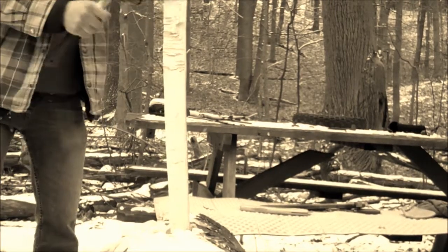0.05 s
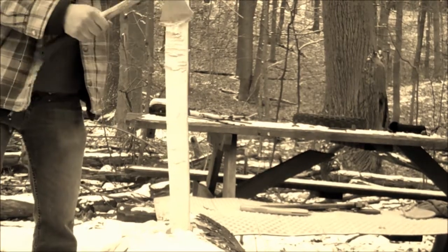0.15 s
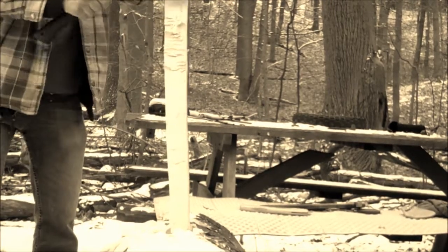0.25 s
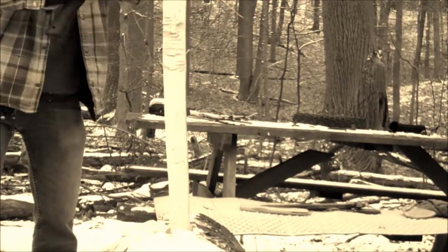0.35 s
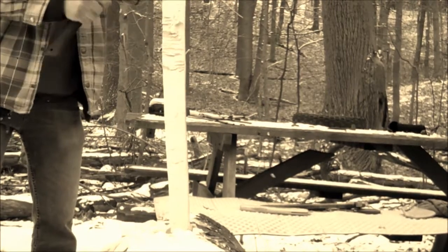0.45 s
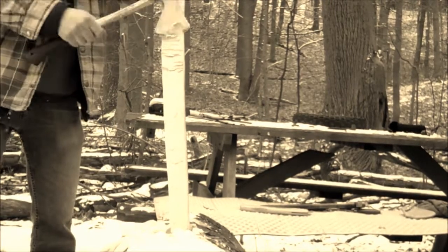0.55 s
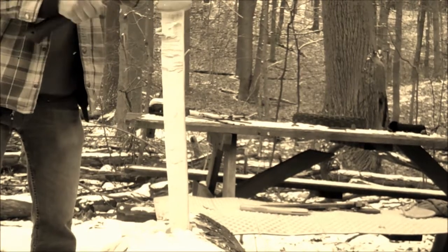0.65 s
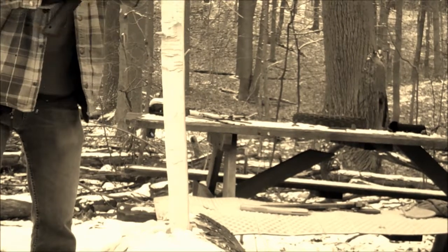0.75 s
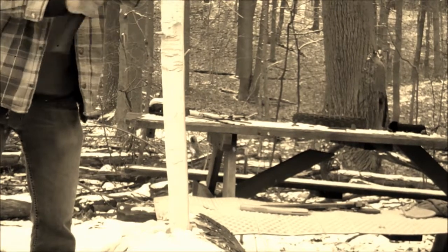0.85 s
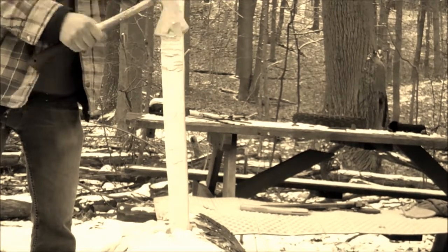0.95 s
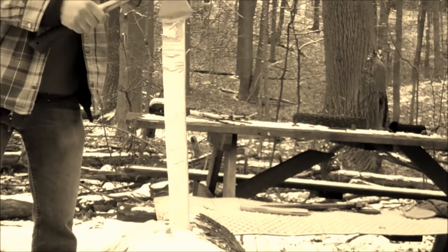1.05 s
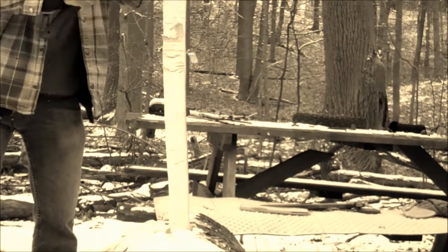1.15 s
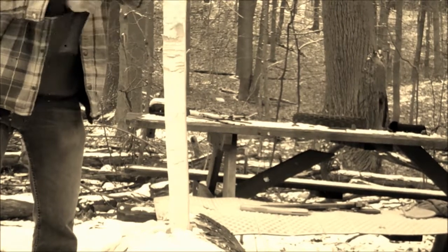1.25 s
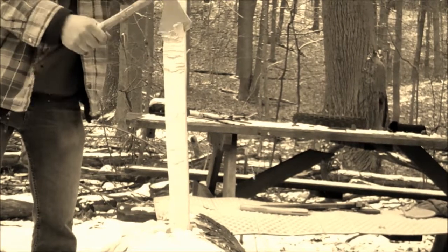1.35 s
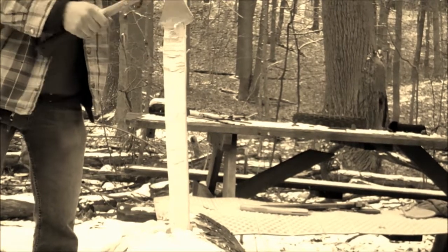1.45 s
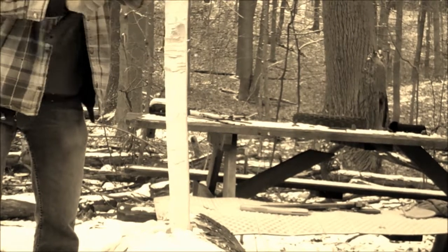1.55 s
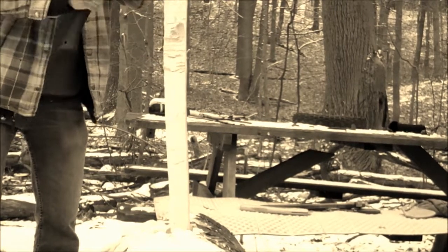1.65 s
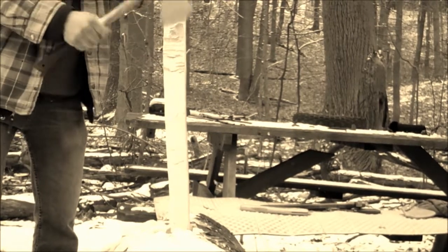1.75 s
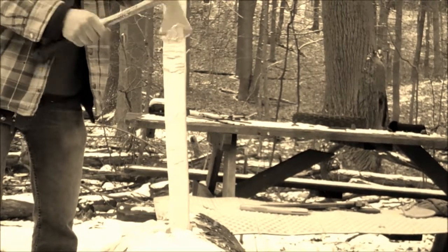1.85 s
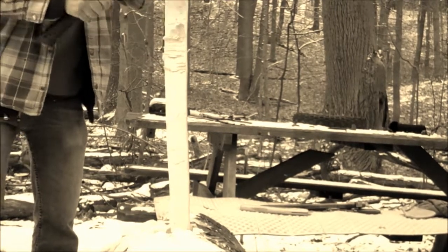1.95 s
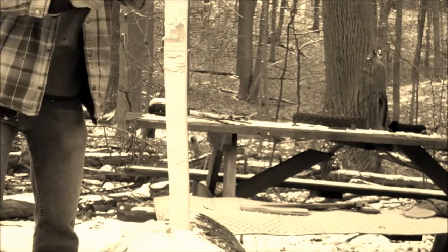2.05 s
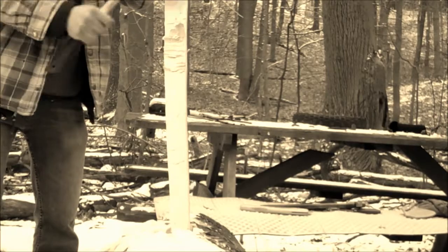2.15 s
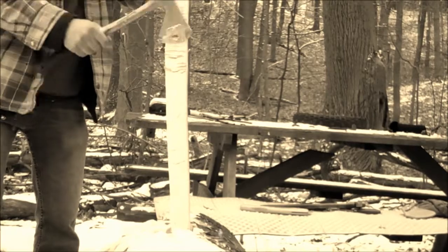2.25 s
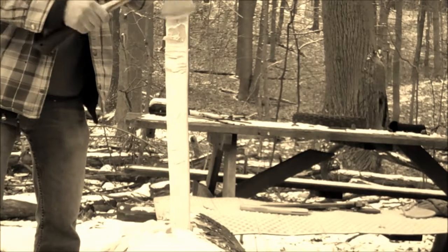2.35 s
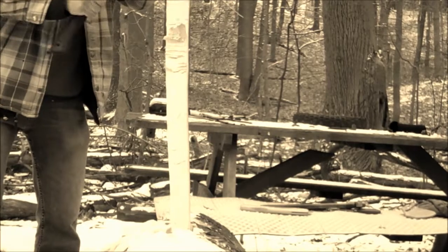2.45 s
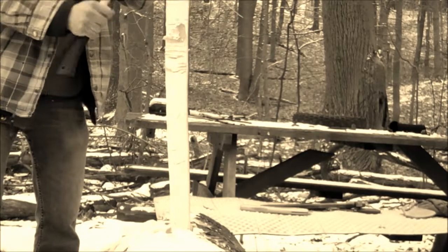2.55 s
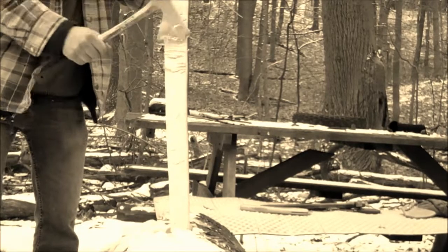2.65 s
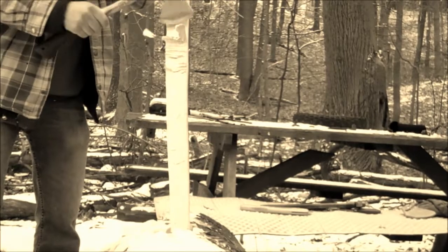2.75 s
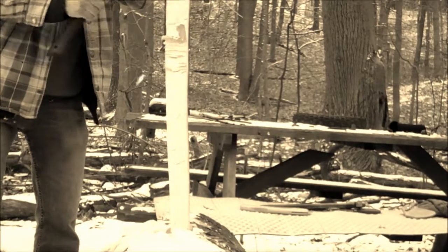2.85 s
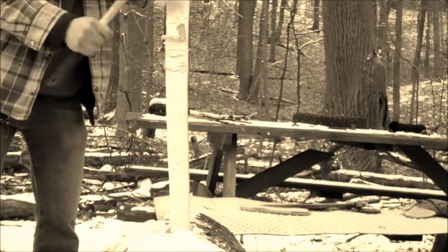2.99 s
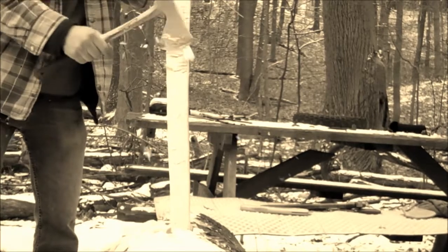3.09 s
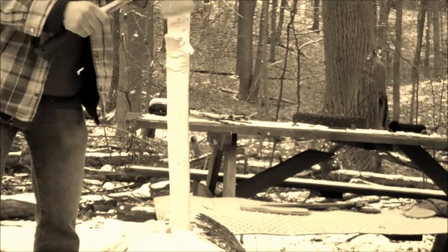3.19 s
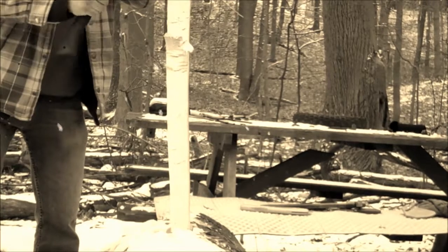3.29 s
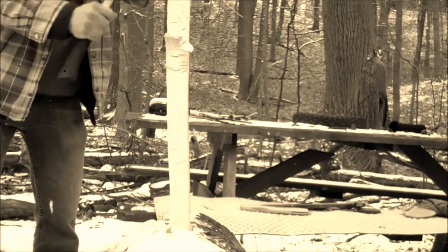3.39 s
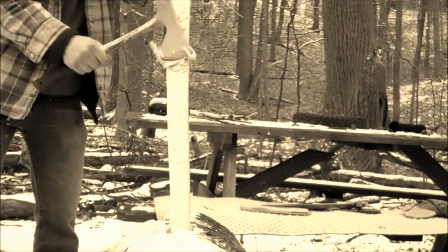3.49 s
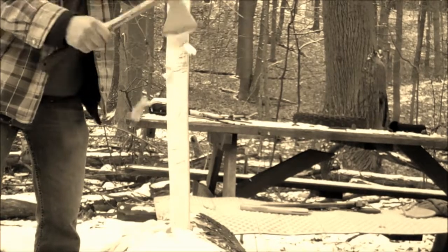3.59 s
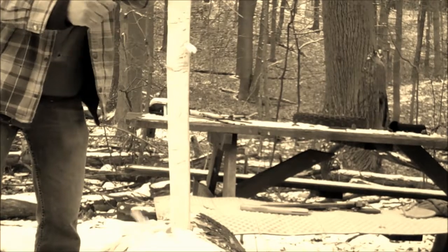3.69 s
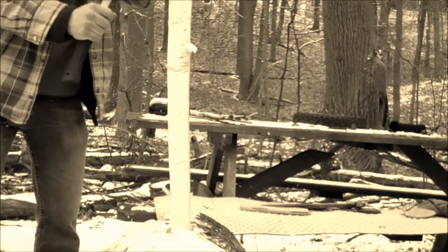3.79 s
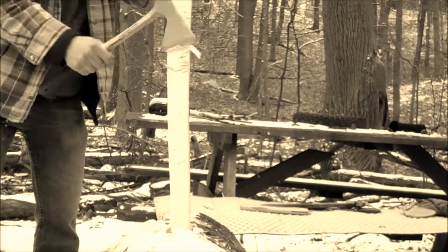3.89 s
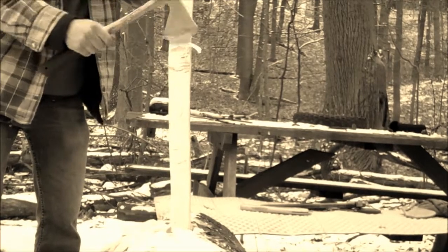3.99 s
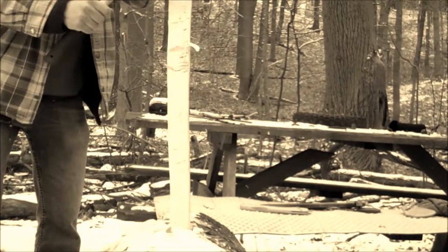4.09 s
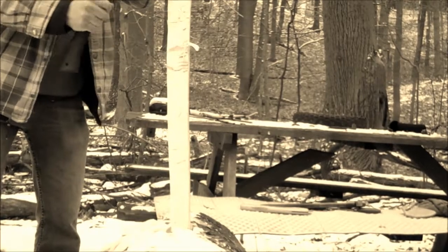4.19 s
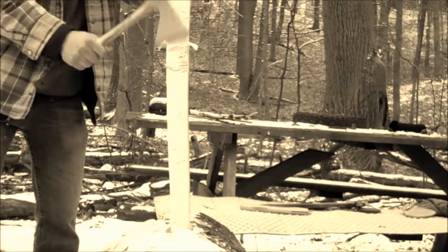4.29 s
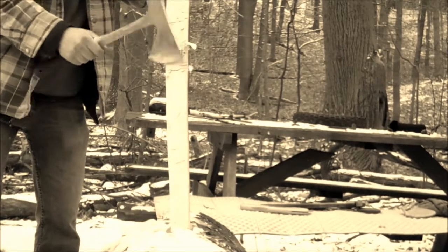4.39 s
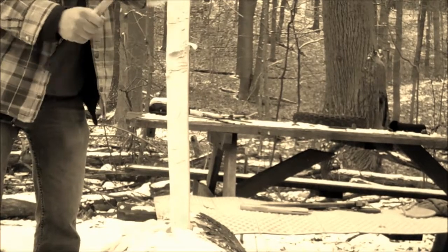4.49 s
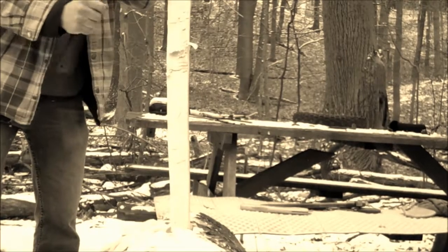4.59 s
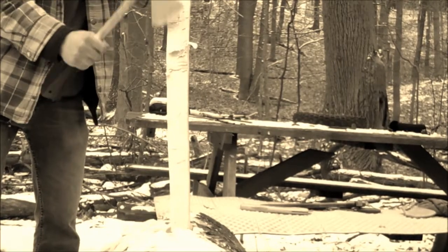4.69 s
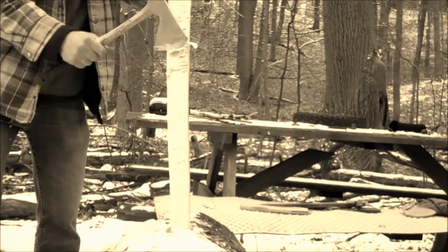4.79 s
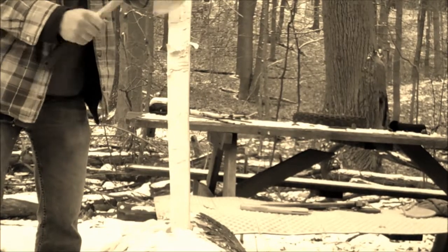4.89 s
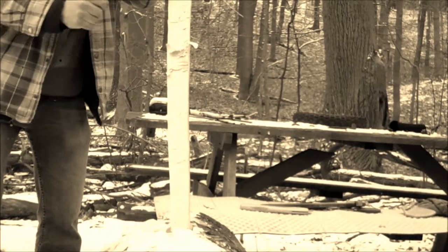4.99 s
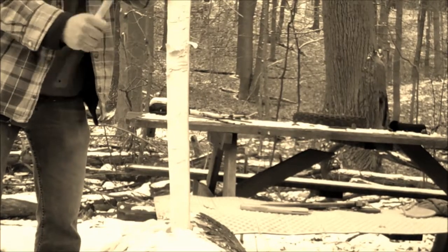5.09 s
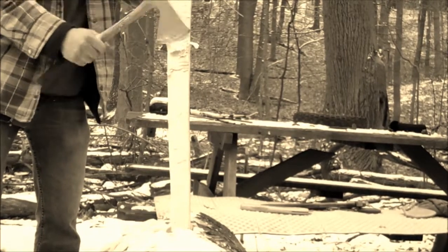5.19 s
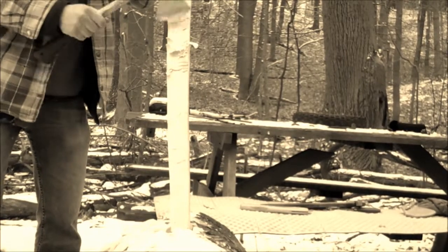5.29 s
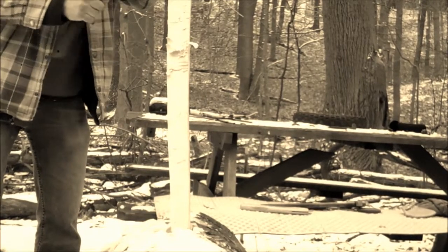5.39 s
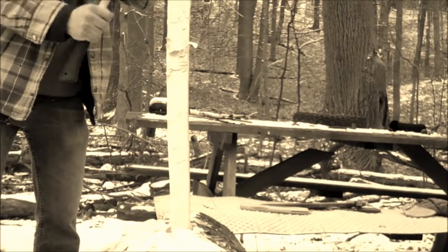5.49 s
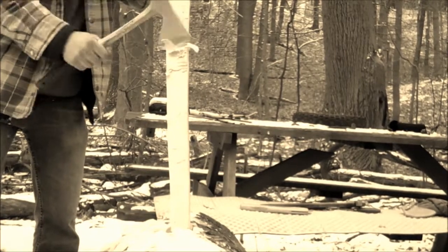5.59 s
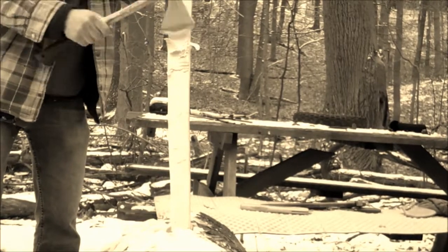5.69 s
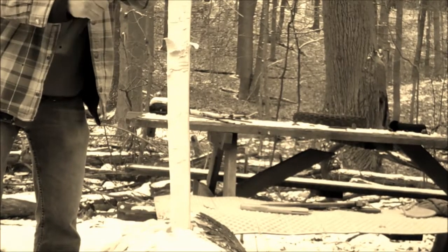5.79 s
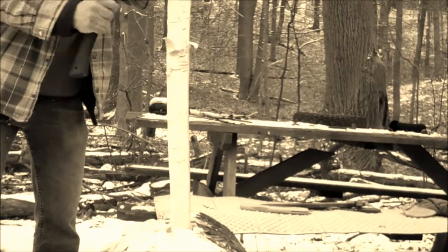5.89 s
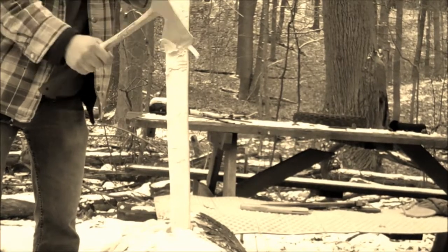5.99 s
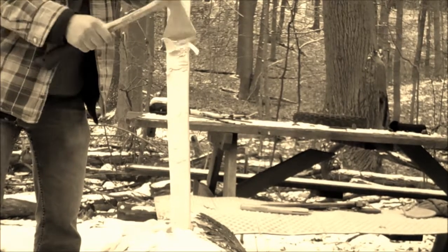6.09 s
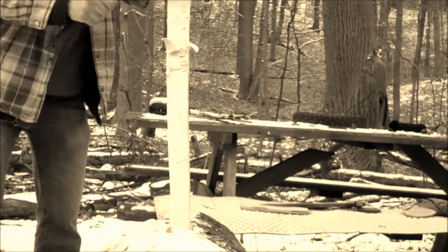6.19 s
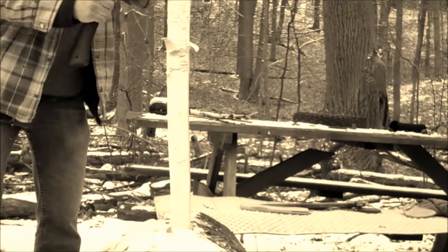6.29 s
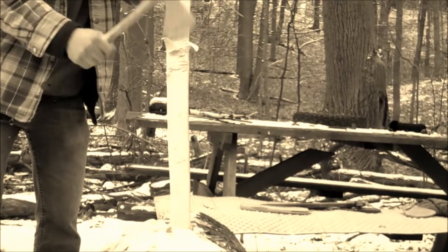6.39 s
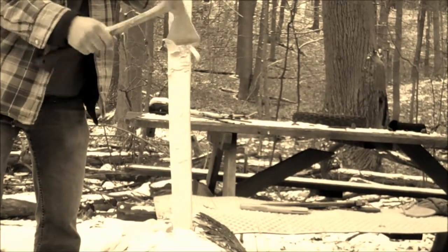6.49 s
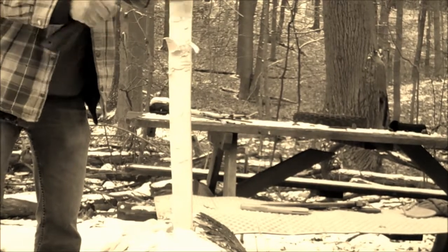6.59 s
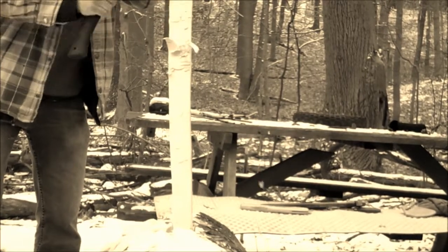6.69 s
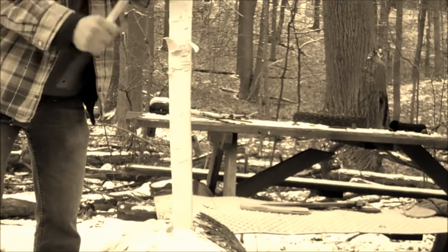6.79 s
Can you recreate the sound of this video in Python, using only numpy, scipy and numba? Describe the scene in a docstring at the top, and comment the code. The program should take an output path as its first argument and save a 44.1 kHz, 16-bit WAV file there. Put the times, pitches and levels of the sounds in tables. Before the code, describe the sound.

A hatchet chops an upright wooden stave in quick, steady, sharp strokes, with small splintering cracks and chip ticks, over soft forest air and wind rumble.

```python
"""Chopping wood in a forest

A hatchet chops an upright wooden stave a few metres from a small camera. Each blow adds fading tones for
the wood and shaped noise for the cut, and the ground sends back a duller copy.
More noise bursts make tearing fibres and ticking chips; sine tones make the ringing steel head, a whirring
chip and the jolted ground; noise echoes come off the trunks. Filtered noise makes the forest background,
which dips after most blows, and the wind, strongest at the right port. Gain control tames the peaks.
"""
import sys
import numpy as np
from scipy import signal
from scipy.io import wavfile
from scipy.ndimage import uniform_filter1d
from numba import njit

SR = 44100
rng = np.random.default_rng(int(sys.argv[2]) if len(sys.argv) > 2 else 0)


def pcm_store(signal):
    """Save signal as 16-bit PCM."""
    levels = np.round(np.clip(np.atleast_2d(signal), -1, 1) * 32767)
    wavfile.write(sys.argv[1], SR, levels.astype(np.int16).T)


N = 302068

# All levels are set before the camera's gain control.
# Hatchet blows: start_s, knock_db, knock_hz, then levels relative to the knock: boom_db, thud_db, clack_db,
# crack_db, splinter_db, ground_echo_db; then ring_factor (times the ring time), background_dip_db
BLOWS = [(0.1161, -12, 2730, -11.5, -7, -40, -7.5, -38, -14, 0.76, 1),
         (0.5278, -12.5, 1481, -20, -17, -1.5, -8, -13.5, -17, 0.79, 7.5),
         (0.9502, -13.5, 1850, -31, -38, 3.5, -5.5, -19, -16.5, 0.89, 7.5),
         (1.3805, -12, 1590, -20.5, -6, -23, -13, -16, -6.5, 0.78, -0.2),
         (1.794, -6, 1490, -36, -17, 1.5, -37.5, -17.5, -14, 0.75, 6),
         (2.2196, -5, 1913, -24, -16, 8.5, -9, -27.5, -12.5, 0.61, 0.5),
         (2.6419, -8, 2177, -17, -17.5, 0.5, -10, -28.5, -17, 0.97, 3),
         (3.047, -7, 2513, -22, -21.5, 6, -9, -21, -12.5, 0.75, 12.5),
         (3.473, -6.5, 2470, -29, -22, -4, -4.5, -19, -10.5, 1, 9.5),
         (3.893, -4, 1736, -31.5, -12.5, -6, -19, -18, 0, 0.61, 3.5),
         (4.3177, -11, 1480, -16.5, -6, 1.5, -11, -22.5, -7.5, 0.5, 5.5),
         (4.7405, -7.5, 1516, -18, -12, 5, -14.5, -13, -7.5, 0.57, 1.5),
         (5.1658, -13.5, 1498, -15, -5.5, 0, -6.5, -26.5, -4.5, 0.79, 0.8),
         (5.5784, -3, 1491, -18.5, -14, 4.5, -12.5, -29, -8.5, 0.61, 2),
         (6.0111, -5, 2260, -25.5, -10, -9, -8, -47, -2.5, 0.52, 4.5),
         (6.4465, -7, 1630, -15, -9.5, -7.5, -13, -20, -6, 0.83, 4)]
# Tearing fibres: centre_s, level_db, length_s, pitch_hz
TEARS = [(0.118, -16, 0.0042, 4860), (0.167, -41, 0.0037, 2000), (0.238, -42, 0.008, 7000),
         (0.636, -52, 0.018, 5000), (3.757, -46.5, 0.0065, 2500), (0.537, -32, 0.0047, 4000),
         (.548, -20.5, 0.0092, 8100), (0.967, -19.5, 0.0065, 7540), (0.974, -17.5, 0.0021, 8250),
         (0.984, -38, 0.01, 6040), (1.428, -31, 0.0091, 875), (1.807, -21.5, 0.014, 4000),
         (2.653, -20, 0.0048, 6000), (2.892, -42.5, 0.0041, 2010), (3.059, -12.5, 0.0027, 9300),
         (3.083, -40.5, 0.04, 5970), (3.485, -21, 0.012, 8000), (3.517, -32, 0.0016, 7070),
         (3.856, -46.5, 0.0053, 2520), (4.333, -12.5, 0.0055, 6930), (4.337, -29, 0.018, 6050),
         (4.358, -29.5, 0.013, 8000), (5.172, -22, 0.0071, 6000), (5.198, -15, 0.029, 400),
         (6.016, -17, 0.0059, 8000)]
# The louder ticks of chips and splinters: start_s, level_db, pitch_hz
TICKS = [(1.1313, -38, 12600), (1.531, -31.5, 11900), (2.019, -37, 13200), (2.362, -40.5, 13000),
         (2.5256, -33.5, 9160), (2.893, -41.5, 11570), (3.207, -34, 12300), (3.5433, -33, 12700),
         (3.76, -40, 12200), (3.786, -37, 11900), (3.856, -43.5, 11800), (4.175, -38, 10900),
         (4.24, -18, 10250), (4.255, -29.5, 11980), (4.8458, -31, 11700), (5.304, -34, 9340),
         (5.8366, -29.5, 8930), (6.075, -35, 11370), (6.7451, -29.5, 8900), (6.772, -41, 12200)]
# Tones of the wooden stave, before each blow varies them: pitch_hz, relative_level_db, t60_s (time to fall 60 dB)
STAVE_MODES = [(190, -5.5, 0.051), (262.8, 12.5, 0.1), (316, -8.5, 0.065), (423, -6, .035), (495, 7.5, 0.1),
               (620, -9, 0.059), (720, 2.5, 0.065), (958, -11.5, 0.15), (1281, -17, 0.01),
               (1520, -2.5, 0.064), (1750, -6, 0.033), (1820, -5.5, 0.031), (2210, -10, 0.068),
               (2499, 7, 0.015), (2670, 1, 0.0096), (3020, -6, 0.0048), (3707, 3.5, 0.0099),
               (3840, -4.5, 0.018), (4838, 0, 0.017), (5480, 7.5, 0.0073)]
# Tones of the steel head: pitch_hz, t60_s
STEEL_MODES = [(3768, 0.27), (9190, 0.11)]
# Bands of the sharp crack: pitch_hz, width_hz, relative_level_db
CRACK_BANDS = [(6610, 1500, -61.5), (8484, 890, -1), (13200, 22000, 3)]
# Ringing of the head after some blows: start_s, low_tone_db, high_tone_db
HEAD_RINGS = [(0.953, -39.5, -63.5), (1.384, -61, -64), (3.478, -51.5, -43.5), (3.897, -52, -70.5),
              (4.335, -42.5, -42), (4.744, -49, -74.5), (5.17, -62.5, -41)]
# Echoes from the trunks: pitch_hz, t60_s, relative_level_db
TRUNK_ECHOES = [(1530, 0.4, -38.5), (2160, 0.5, -42), (3950, 0.033, -38), (9100, 0.2, -38.5)]
# Wind buffeting the ports, before the dips: time_s, level_db
WIND_LEVEL = [(0, -56.5), (.5, -69), (1.1, -64), (1.5, -62), (1.9, -58.5), (2.3, -59.5), (2.75, -51.5),
              (3.1, -60), (3.4, -50.5), (3.65, -66), (4.2, -49.5), (4.45, -59), (4.75, -48.5), (5.08, -43),
              (5.25, -57.5), (5.45, -46.5), (5.8, -63), (6.25, -59.5), (6.6, -51.5), (6.85, -56)]
# The stronger eddies hitting the right port: centre_s, level_db, length_s, pitch_hz
THUMPS = [(2.314, -28.5, 0.01, 119), (2.672, -28, 0.027, 147), (2.737, -24, 0.0071, 133),
          (2.895, -27, 0.0054, 124), (2.943, -31.5, 0.0088, 85), (3.346, -30.5, 0.0058, 135),
          (3.376, -32.5, 0.0075, 101), (3.432, -31, 0.0046, 133), (3.822, -29.5, 0.0065, 119),
          (4.145, -35, 0.023, 98), (4.202, -35, 0.0055, 128.6), (4.244, -35.5, 0.0092, 149),
          (4.418, -30, 0.0081, 119), (4.571, -28, 0.0084, 142.4), (4.69, -32.5, 0.0088, 140),
          (4.955, -22, 0.0034, 128), (4.98, -27, 0.0195, 134), (5.038, -21.5, 0.0045, 168),
          (5.067, -21.5, 0.0025, 185), (5.12, -30, 0.01, 154), (5.144, -25, 0.0044, 185),
          (5.203, -32.5, 0.014, 87), (5.441, -34.5, 0.031, 138), (5.486, -25.5, 0.0048, 198),
          (6.806, -27.5, 0.0067, 129)]
# Tone colour of the background, before its layers are levelled: pitch_hz, relative_level_db (per Hz)
AIR_COLOUR = [(18, -40), (30, 16), (70, -1), (236, 14), (405, -4.5), (449, -6), (1590, -19), (1950, -11.5),
              (2460, -24.5), (3620, -44), (4940, -36), (5470, -53), (6550, -42.5), (12800, -35.5),
              (14200, -37)]
# Slow swell of the background, before the dips: time_s, drone_db, leaves_db
SWELL = [(0, -59.5, -63), (.45, -59.5, -65.5), (.9, -57, -66.5), (1.5, -52.5, -64.5), (2.1, -51, -62.5),
         (2.4, -56, -63), (2.9, -57.5, -63.5), (3.4, -60, -66), (3.8, -58.5, -63), (4.2, -53.5, -62),
         (4.6, -55, -71), (4.85, -56.5, -62.5), (5.15, -49, -68), (5.55, -50.5, -70.5), (5.8, -52.5, -61.5),
         (6.3, -55, -61.5), (6.85, -57, -63)]
# Borders between drone, wind in the trees, leaf wash and hiss: pitch_hz
LAYER_EDGES_HZ = [330, 1200, 3000]
# How much of each dip is used by drone, wind in the trees, leaf wash, hiss, buffeting: share (no unit)
DIP_SHARES = [0.63, 1.05, .7, 0.88, 0.7]

CRUNCH_DB = -26  # every blow crushes the cut about equally loudly
ECHO_S = 0.0027  # the ground sends back a duller copy of the knock after this time
FAINT_TICKS, LOWEST_FAINT_TICK_DB, FAINT_TICK_HZ = 10, -50, 12000  # scattered at random
WHIRR_S, WHIRR_LENGTH_S, WHIRR_DB, WHIRR_FROM_HZ, WHIRR_TO_HZ = 1.03, .04, -52, 3050, 2100
JOLT_DB, JOLT_HZ, JOLT_T60_S = -41, 89, .05
# Typical faint eddy; its level is counted from the WIND_LEVEL table
FAINT_EDDIES, FAINT_EDDY_DB, FAINT_EDDY_S, FAINT_EDDY_HZ = 60, 12.5, 0.013, 115
# Wind in the trees when the drone is at -56 dB, and its rise in dB per dB of drone
TREES_DB, TREES_FOLLOW = -62.5, 0.42
HISS_DB = -57  # before the dips
DIP_DEEPEST_S, DIP_SHARPNESS = 0.14, 3.3  # time from blow to lowest background; a higher sharpness is narrower
FIRST_CUT_HZ, TOP_HZ = 14200, 16700  # corner of the first, partial treble cut; corner of the full one


def undb(db):
    """Turn decibels into a gain."""
    return 10 ** (np.asarray(db) / 20)


def band(x, hz, width):
    """Let a band of pitches through, with gain 1 at its centre."""
    return signal.lfilter(*signal.iirpeak(min(hz, .45 * SR), hz / width, fs=SR), x)


def unit(x):
    """Scale to an average (rms) level of 1."""
    return x / np.sqrt(np.mean(x ** 2))


def fade(t, t60):
    """Die away smoothly, falling 60 dB in t60 seconds."""
    return 1000. ** (-t / t60)


def add(out, s, x):
    """Mix a sound in at time s."""
    k = int(s * SR)
    out[..., k:k + len(x)] += x[:N - k]


def curve(table):
    """Gain that follows a table of times and decibels."""
    return undb(np.interp(np.arange(N) / SR, *np.transpose(table)))


def walk(rate):
    """Random levels, held for 1 / rate seconds and smoothed twice."""
    k = int(SR / rate)
    steps = np.repeat(rng.standard_normal(2000)[:N // k + 1], k)
    return 1.3 * uniform_filter1d(uniform_filter1d(steps, k), k)[:N]


@njit
def follow(x, attack, release):
    """Track loudness, with separate speeds for rising and sinking."""
    y, e = np.empty(len(x)), 0.
    for i in range(len(x)):
        e += (x[i] - e) * (attack if x[i] > e else release)
        y[i] = e
    return y


def stave(t, knock_hz, boom_db, thud_db, clack_db, ring):
    """The struck stave rings in many fading tones at once."""
    hz, db, t60 = np.transpose(STAVE_MODES)[:, :, None]
    level_chance, pitch_chance = rng.standard_normal((2, len(STAVE_MODES), 1))
    # The struck spot favours tones near its own pitch
    knock_db = -6 * np.abs(np.log2(hz / knock_hz))
    group_db = np.select([hz < 370, hz < 1100, hz > 3000], [boom_db, thud_db, clack_db], knock_db)
    db = db + group_db + 1.5 * level_chance
    turn = 2 * np.pi * hz * (1 + 0.021 * pitch_chance) * t
    wood = undb(db) * np.sin(turn) * fade(t, t60 * ring)
    # The edge pushes for a moment, so slow tones bloom late
    wood *= 1 - np.exp(-t * hz / 0.34)
    return wood.sum(axis=0)


def crush(t, noise):
    """The wedge crushes on into the cut: jerky noise rings through the lower stave tones."""
    jerks = np.repeat(rng.standard_normal(len(t) // 100 + 1), 100)[:len(t)]
    jolts = band(noise * undb(4 * jerks), 1000, 3000)
    crunch = np.zeros(len(t))
    for hz, _, t60 in STAVE_MODES:
        if hz < 3000:
            crunch += 0.21 * unit(band(jolts, hz, 14 / t60)) * fade(t, 0.08 * (hz / 1000) ** -0.35)
    return crunch


def blow(crunch_db, knock_hz, boom_db, thud_db, clack_db, crack_db, splinter_db, echo_db, ring):
    """One chop: the stave rings, the grain gives way noisily and the ground sends back a duller copy."""
    t = np.arange(SR // 4) / SR
    wood = stave(t, knock_hz, boom_db, thud_db, clack_db, ring)
    noise = rng.standard_normal((4, len(t)))
    bite = unit(band(band(noise[0], knock_hz, 1100), 1900, 1700))
    bite = undb(-0.5) * bite * fade(t, 0.014 * ring)
    crack = sum(undb(db) * unit(band(noise[1], hz, width)) for hz, width, db in CRACK_BANDS)
    crack = undb(crack_db) * crack * fade(t, 0.0099)
    splinters = undb(splinter_db) * unit(band(noise[2], 6800, 11000)) * fade(t, 0.035)
    crunch = undb(crunch_db) * crush(t, noise[3])
    direct = undb(-7.5) * wood + bite + crack
    direct *= np.minimum(t / 0.00085, 1)  # the edge takes a moment to bite
    lag = int(ECHO_S * SR)
    dull = signal.lfilter(*signal.butter(1, 5000, fs=SR), direct)
    ground_echo = undb(echo_db) * np.r_[np.zeros(lag), dull[:-lag]]
    return direct + splinters + crunch + ground_echo


def tears():
    """Fibres snap unevenly: short swells of spiky noise."""
    out, t = np.zeros(N), np.arange(SR // 10) / SR - .05
    for s, db, length, hz in TEARS:
        snaps = rng.standard_normal(len(t)) * undb(4.32 * rng.exponential(size=len(t)) - 10.5)
        snaps *= np.exp(-2 * (t / length) ** 2)
        add(out, s + t[0], undb(db) * band(band(snaps, hz, 1.8 * hz), hz, 2.2 * hz))
    return out


def ticks():
    """Chips and splinters tick: tiny bright bursts of noise, some at random times."""
    out, t = np.zeros(N), np.arange(SR // 10) / SR
    faint = [(u * (N / SR - .1), LOWEST_FAINT_TICK_DB + 6 * v, FAINT_TICK_HZ)
             for u, v in rng.random((FAINT_TICKS, 2))]
    for s, db, hz in TICKS + faint:
        burst = rng.standard_normal(len(t)) * fade(t, 0.0047)
        add(out, s, undb(db) * band(band(burst, hz, 0.48 * hz), hz, 1.1 * hz))
    return out


def chopping():
    """The hatchet work: blows together with tearing fibres and ticking chips."""
    out = np.zeros(N)
    for s, db, *how, _ in BLOWS:
        # The crunch is set against the knock, so its own level stays put
        add(out, s, undb(db) * blow(CRUNCH_DB - db, *how))
    return out + tears() + ticks()


def steel():
    """The hatchet head sings thinly in two fading tones."""
    out, t = np.zeros(N), np.arange(SR // 2) / SR
    for s, *mode_db in HEAD_RINGS:
        for db, (hz, t60) in zip(mode_db, STEEL_MODES):
            add(out, s, undb(db) * np.sin(2 * np.pi * hz * t) * fade(t, t60))
    return out


def whirr():
    """A flung chip spins past: a rough whistle sliding down."""
    out, u = np.zeros(N), np.linspace(0, 1, int(WHIRR_LENGTH_S * SR))
    hz = WHIRR_FROM_HZ + (WHIRR_TO_HZ - WHIRR_FROM_HZ) * u
    turn = 2 * np.pi * np.cumsum(hz) / SR
    rough = 1 + 1.1 * unit(band(rng.standard_normal(len(u)), 200, 300))
    swell = np.sin(np.pi * u ** 1.7)
    add(out, WHIRR_S, undb(WHIRR_DB) * swell * rough * np.sin(turn))
    return out


def ground():
    """Each blow shakes the ground under the stave: a short low thump."""
    out, t = np.zeros(N), np.arange(SR // 4) / SR
    for s, *_ in BLOWS:
        add(out, s, undb(JOLT_DB) * np.sin(2 * np.pi * JOLT_HZ * t) * fade(t, JOLT_T60_S))
    return out


def ports(x):
    """A reflection off the camera body reaches the two ports unequally, more so in the treble."""
    body = signal.lfilter(*signal.butter(1, 1500, "high", fs=SR), np.roll(x, 60))
    treble = signal.lfilter(*signal.butter(2, 9000, "high", fs=SR), np.roll(x, 23))
    return x + (undb(-15) * body + undb(-10.5) * treble) * np.array([[1], [-1]])


def trunks(x):
    """Trees scatter the sound: each band's power returns as fading noise, unrelated at the two ports."""
    t, out = np.arange(SR // 2) / SR, 0
    for hz, t60, db in TRUNK_ECHOES:
        # Half the time, because the square root below slows the fade again
        spread = fade(t, t60 / 2) * np.minimum(t / 0.0085, 1)
        power = signal.fftconvolve(band(x, hz, .7 * hz) ** 2, spread)[:N]
        wash = band(rng.standard_normal((2, N)), hz, .3 * hz)
        out = out + undb(db) * np.sqrt(np.abs(power)) * wash
    return out


def dip_db():
    """After most blows the background sinks for a moment and returns, by each blow's own amount."""
    blows = np.array(BLOWS)
    # Worked out once per 64 samples
    after = np.maximum(np.arange(0, N, 64) / SR - blows[:, :1], 0) / DIP_DEEPEST_S
    dips = blows[:, -1:] * (after * np.exp(1 - after)) ** DIP_SHARPNESS
    return -np.repeat(dips.sum(axis=0), 64)[:N]


def eddies():
    """Eddies thump on a port: short low swells, the stronger at set times and faint ones at random."""
    thumps, t = np.zeros(N), np.arange(SR // 10) / SR - .05
    when = .05 + rng.random(FAINT_EDDIES) * (N / SR - .1)
    faint = []
    for s, (u, v, w) in zip(when, rng.standard_normal((FAINT_EDDIES, 3))):
        db = np.interp(s, *np.transpose(WIND_LEVEL)) + FAINT_EDDY_DB + 3 * u
        faint.append((s, db, FAINT_EDDY_S * 1.5 ** v, FAINT_EDDY_HZ * 1.25 ** w))
    for s, db, length, hz in THUMPS + faint:
        turn = 2 * np.pi * (hz * t + rng.random())
        add(thumps, s - .05, undb(db) * np.sin(turn) * np.exp(-2.4 * (t / length) ** 2))
    return thumps


def wind():
    """Moving air rumbles on both ports as uneven low noise, and its eddies thump on the right one."""
    rumble = []
    for db in (-4, 0):  # left, right
        gusty = rng.standard_normal(N) * undb(1.4 * walk(51))
        rumble.append(undb(db) * unit(band(band(gusty, 90, 130), 99, 280)))
    buffet = curve(WIND_LEVEL) * undb(DIP_SHARES[-1] * dip_db()) * np.array(rumble)
    thumps = eddies()
    # The left port feels each eddy late and weakly
    return buffet + np.array([0.2 * np.roll(thumps, 120), thumps])


def air():
    """Background noise in third-octave bands: drone, wind in the trees, leaf wash and hiss."""
    layers = [0, 0, 0, 0]
    hz_at, db_at = np.transpose(AIR_COLOUR)
    for hz in 40 * 2 ** np.arange(0, 8.6, 1 / 3):
        mid, side = band(band(rng.standard_normal((2, N)), hz, hz / 3), hz, hz / 3)
        # Higher bands differ more between left and right
        width = np.clip(0.038 + hz / 2500, 0, 1)
        both = mid + width * side * np.array([[1], [-1]])
        colour_db = np.interp(np.log(hz), np.log(hz_at), db_at)
        layers[np.searchsorted(LAYER_EDGES_HZ, hz)] += undb(colour_db) * both
    s, drone_db, leaves_db = np.transpose(SWELL)
    trees_db = TREES_DB + TREES_FOLLOW * (drone_db + 56)
    levels = [drone_db, trees_db, leaves_db, HISS_DB + 0 * s]
    dip, out = dip_db(), 0
    for layer, db, share in zip(layers, levels, DIP_SHARES):
        out = out + unit(layer) * curve(np.c_[s, db]) * undb(share * dip)
    return out


def scene():
    """Everything heard at the two ports."""
    chop = chopping()
    near = ports(chop + steel() + whirr() + ground())
    return near + trunks(chop) + air() + wind()


def record(dry):
    """Gain control turns loud moments down and creeps back, peaks are rounded off, the top is cut."""
    # Speeds come from times in seconds: rise, then fall
    loud = follow(np.abs(dry).max(axis=0), 1 / (0.0074 * SR), 1 / (.12 * SR))
    loud = follow(loud, 1 / (0.016 * SR), 1 / (0.013 * SR))
    x = dry * np.minimum(1, (undb(-32) / (loud + 1e-9)) ** 0.53)
    x = x / (1 + (x / .52) ** 4) ** .25  # peaks cannot pass 0.52 here
    x = signal.sosfilt(signal.ellip(7, .3, 32, FIRST_CUT_HZ, fs=SR, output="sos"), x)
    return signal.sosfilt(signal.ellip(10, .2, 80, TOP_HZ, fs=SR, output="sos"), x)


dry = scene()
out = record(dry)
pcm_store(out)
```